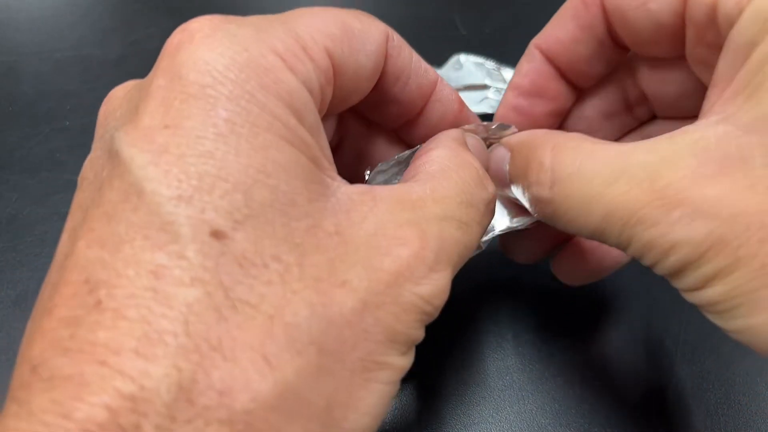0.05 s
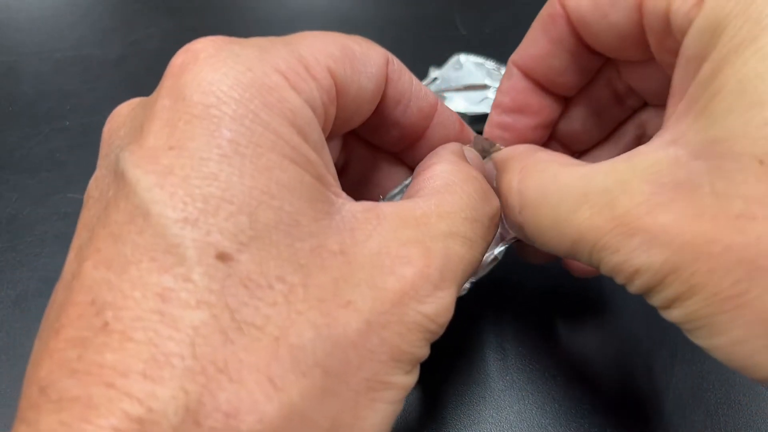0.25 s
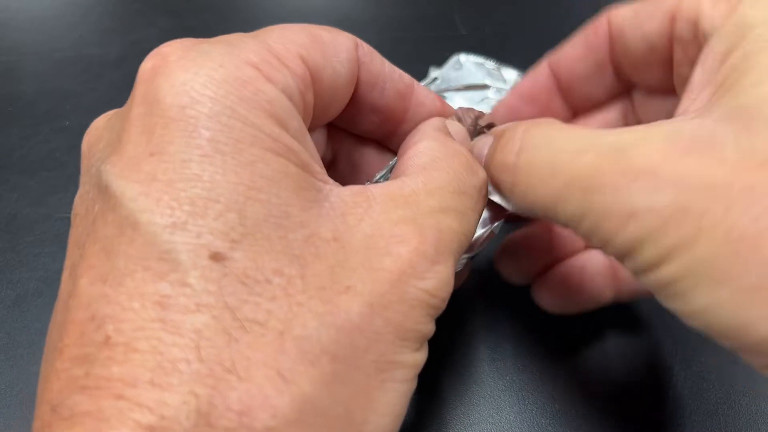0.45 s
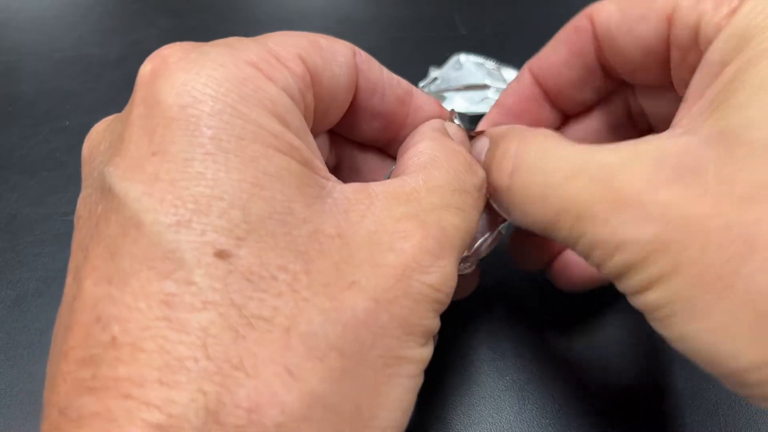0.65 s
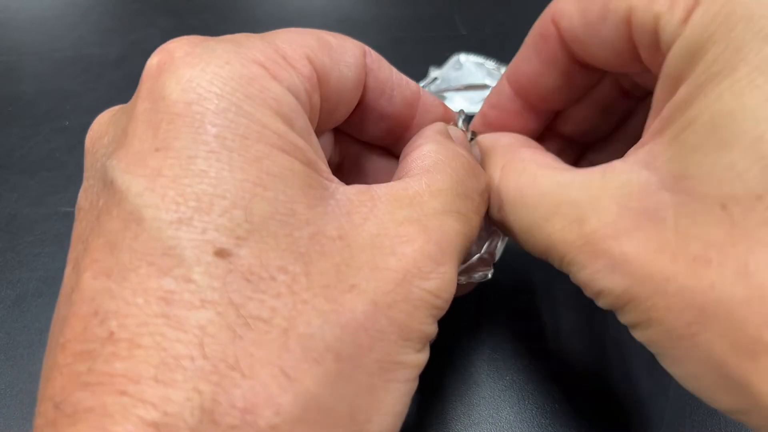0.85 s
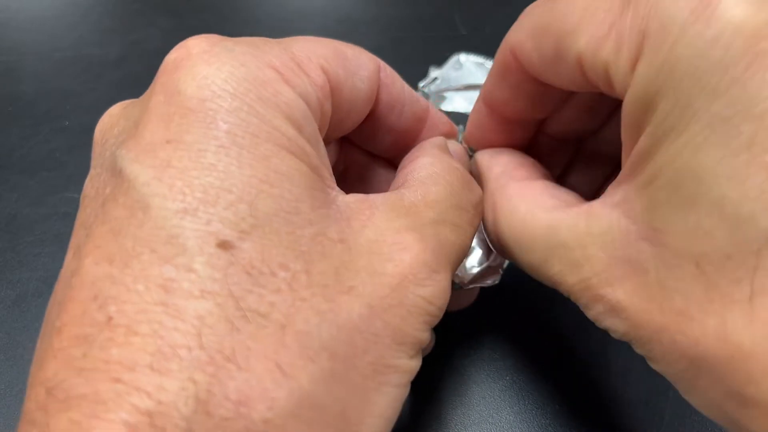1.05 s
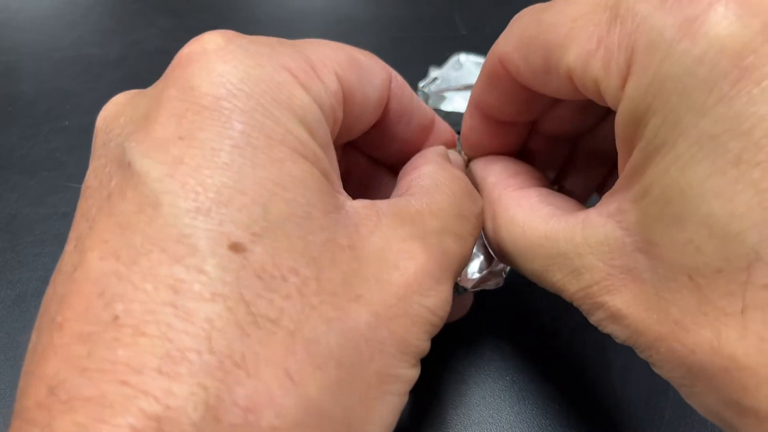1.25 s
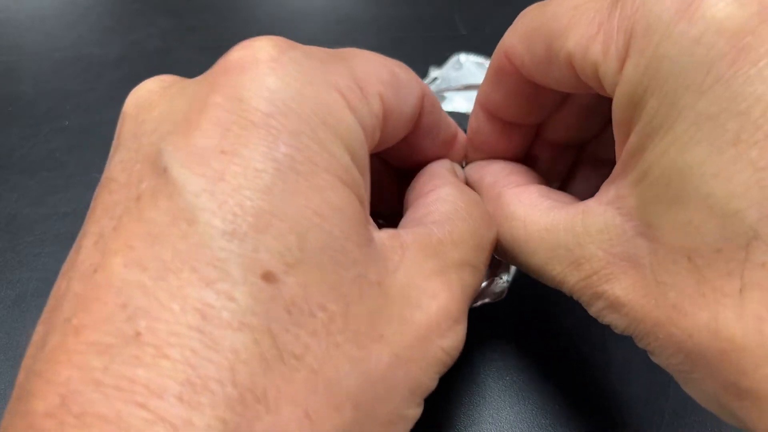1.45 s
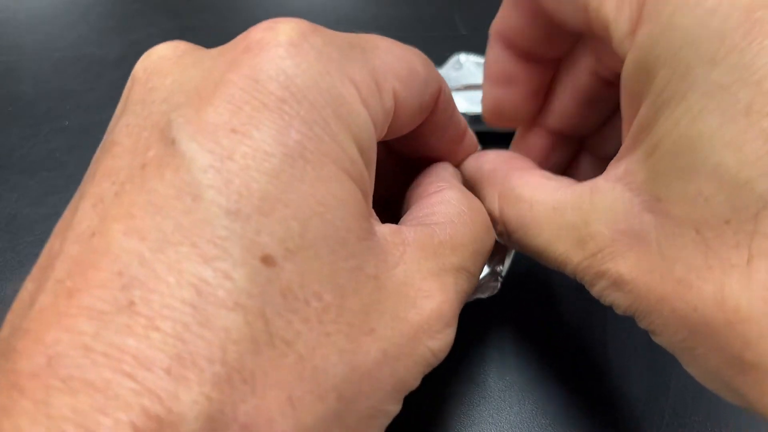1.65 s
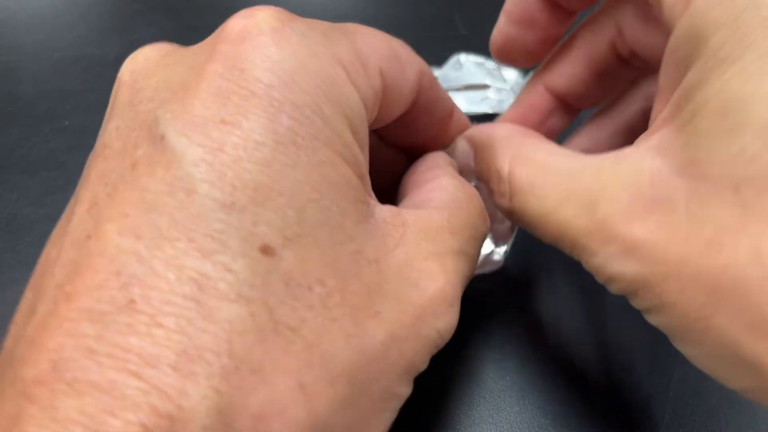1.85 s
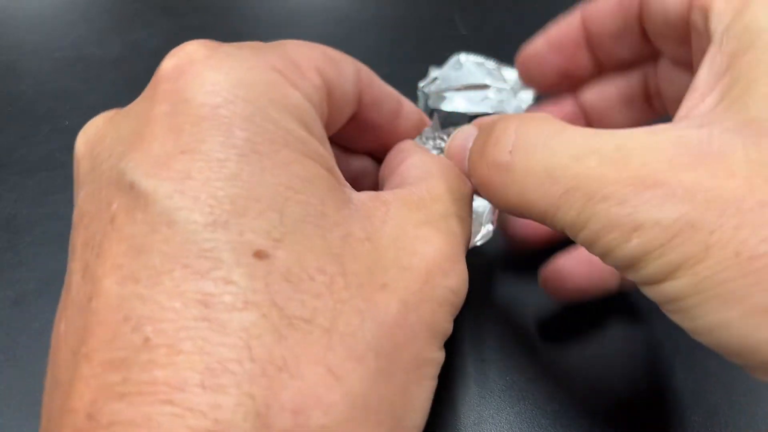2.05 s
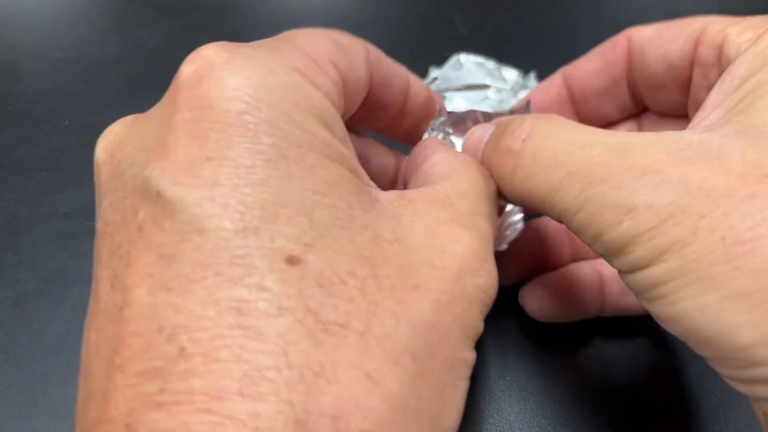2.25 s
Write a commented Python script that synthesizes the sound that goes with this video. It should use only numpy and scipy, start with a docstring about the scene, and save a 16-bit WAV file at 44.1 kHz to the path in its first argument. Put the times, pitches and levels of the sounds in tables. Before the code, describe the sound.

Aluminum foil is folded and pinched by fingers: faint rustle, a cluster of crackles peaking in two sharp snaps, soft rubbing, then scattered brighter ticks. Close stereo microphone, quiet room with low ventilation rumble.

```python
"""Crumpled foil in the fingers, close up

Fingers fold and pinch a crumpled sheet of aluminium foil close to a two-port microphone in a quiet room.
Creases buckle with short snaps: a crack, then a dying burst of grains. Fingertips rub the sheet into a fine
rustle of clumped grains. Both ring the same foil resonances and a gliding hollow; ventilation noise
rumbles underneath with two narrow hums."""
import sys
import numpy as np
from scipy import signal
from scipy.fft import rfft, irfft, next_fast_len
from scipy.io import wavfile

SR = 44100
rng = np.random.default_rng(int(sys.argv[2]) if len(sys.argv) > 2 else 0)


def int16_out(signal):
    """Quantize to a 16-bit WAV file."""
    q = np.round(np.clip(np.atleast_2d(signal).T, -1, 1) * 32767)
    wavfile.write(sys.argv[1], SR, q.astype(np.int16))


N = 101429

# Creases buckling under the fingers. Each row: start in seconds, level in dB before SNAP_DB,
# favoured pitch in Hz, tilt in dB per octave, decay by 60 dB in seconds, extra low body in dB.
CREASE_SNAPS = [(0.0888,-37,1990,-4.5,0.019,7), (0.16,-47.5,1910,-8,0.053,-22),
                (.2139,-43,2170,2.5,0.027,-15), (0.363,-42,1960,-8.5,0.019,-16), (0.377,-34,1900,0,0.024,6),
                (0.3859,-31,2220,-2,0.044,-23), (0.4215,-33,5200,1.5,0.056,-1),
                (0.428,-35.5,3600,-3.5,.015,-15), (0.4737,-37.5,2020,-2,0.021,-20),
                (0.5565,-25.5,4780,2.5,0.011,-20), (0.5665,-24,4440,-3,0.0092,-8),
                (0.5725,-23.5,1990,-0.5,0.013,-16), (0.6032,-23,3250,-2.5,0.013,-18),
                (0.646,-52,1200,-7,0.013,8), (.6756,-12,3300,-1.2,0.0049,-2),
                (.715,-20.5,3640,-7.5,0.0059,-17), (.7318,-5.5,3370,-1,0.0082,-2),
                (0.742,-38.5,4550,-2,0.015,-13), (0.9565,-39,6130,-3,.01,-15),
                (1.3252,-52,3630,-3.5,0.018,-8), (1.4326,-41.5,4800,3,0.013,-8),
                (1.5111,-16,11860,4,0.014,15.5), (1.529,-46.5,776,-8,0.0078,18.5),
                (1.6285,-47.5,1820,-4.5,0.082,7.5), (1.64,-45,4830,6.5,0.031,-6),
                (1.707,-32,3900,-2,0.032,0), (1.7219,-29,3600,-2.5,0.037,7), (1.7669,-19.5,9740,3,0.02,8.5),
                (1.771,-32,1260,1.5,0.015,14), (1.826,-48.5,2000,-14,.015,-11),
                (1.8673,-52,13000,12.5,0.033,-8), (1.9093,-38,11900,9,0.022,-8),
                (1.9552,-49,3720,-3,0.034,6), (1.982,-22,6530,6,0.026,10.5),
                (2.0128,-41,6740,-13,0.011,-7.5), (2.016,-33.5,6700,-0.5,0.021,6),
                (2.2638,-47,3830,4,0.032,-6)]
# Finger pressure on the sheet, heard as rustle. Each row: time in seconds, level in dB, tilt in dB per octave.
FINGER_PRESSURE = [(0, -58.5, -1.5), (0.07, -68, -1), (0.094, -64.5, -10.5), (0.16, -56.5, -6.5),
                   (0.239, -53, -5), (0.275, -66.5, -4.5), (0.345, -68.5, -2.5), (0.365, -49.5, -4.5),
                   (0.41, -51, -3.5), (0.423, -46, -1), (0.454, -41, 0), (0.47, -51.5, -0.5),
                   (0.53, -56, -1), (0.55, -54, -3), (0.561, -42, 1), (0.59, -49, -0.5), (0.62, -64, -3),
                   (0.638, -58, -6.5), (0.648, -53.5, -2), (0.7, -52, -4.5), (0.75, -53, -3),
                   (0.8, -57.5, -3), (0.87, -63, -3.5), (0.92, -60.5, -1), (1.0, -53, -2.3),
                   (1.062, -62, -4), (1.111, -53, -5), (1.165, -61, -1.7), (1.191, -74.5, -6),
                   (1.225, -75, -9.5), (1.239, -60, -6.5), (1.265, -68, -5), (1.285, -52.5, -5),
                   (1.316, -60, -4.5), (1.332, -52.5, -3), (1.421, -59.5, -2.5), (1.469, -57.5, -4),
                   (1.53, -50.5, -1.5), (1.59, -60, -3.5), (1.619, -72, -3), (1.644, -59, 0),
                   (1.7, -51.5, -5), (1.745, -61, -5.5), (1.79, -56, -4.5), (1.835, -60.5, -1.5),
                   (1.85, -49.5, -1.5), (1.869, -48, 1.5), (1.929, -44, 2.5), (1.944, -67, -1),
                   (1.958, -45.5, -1), (1.972, -56, 2.5), (2.0, -68, -12), (2.013, -55, 7),
                   (2.055, -62, -4), (2.075, -73, -6), (2.105, -60, 3.5), (2.14, -67, -8.5),
                   (2.149, -80, 0), (2.175, -77, -5), (2.191, -55, 6), (2.215, -66.5, -4),
                   (2.244, -75.5, -1), (2.263, -50.5, 0.5), (2.3, -59, 0.5)]
# The resonance the grip favours in the rustle. Each row: time in seconds, pitch in Hz, lift in dB.
GRIP_RESONANCE = [(0, 1900, -18), (.3, 4700, 4.5), (.55, 5360, 6.5), (.7, 3540, -2), (1.05, 3460, 2.5),
                  (1.12, 1220, 5), (1.25, 1310, 3), (1.32, 4200, 5), (1.6, 3760, -8), (1.7, 1950, -6),
                  (1.9, 6560, 1), (2.0, 6760, 18.5), (2.22, 6880, 14.5), (2.27, 4030, 5.5)]
# Low body of the rustle. Each row: time in seconds, extra level in dB.
RUSTLE_BODY = [(0, -8), (.15, -3.5), (.3, -5.5), (.5, -1), (.7, -1.5), (1.1, -2), (1.4, -4.5), (1.55, 1),
               (1.75, -1.5), (1.95, 0), (2.3, -5.5)]
# Resonances of the folded sheet between the hands. Each row: centre in Hz, width in Hz, relative level in dB.
FOIL_RESONANCES = [(276, 69, -16.5), (436, 320, -11.5), (740, 820, -10), (1222, 340, -9.5),
                   (1980, 700, -23), (2940, 990, -9.5), (3576, 390, -4), (4610, 725, -2.5),
                   (4970, 520, -4.5), (6354, 690, -5.5), (7540, 520, -5), (9240, 1130, -1.5),
                   (10380, 820, -4), (11100, 1100, -2.5), (12500, 3700, 0), (14470, 2640, -3.5)]
# Narrow ring of the hollow between sheet and hands. Each row: time in seconds, centre in Hz, level in dB.
HOLLOW_RING = [(.09, 1944, -5.5), (.17, 1880, -3), (.36, 1945, -12.5), (.485, 2107, -6), (.6, 2027, -9.5),
               (.72, 1794, -11.5), (1.5, 1793, -14.5), (1.72, 1984, -7), (1.77, 2020, -12.5),
               (1.9, 1930, -0.5), (2.0, 1835, -4.5), (2.14, 1970, -6)]
# Colour of the room noise. Each row: frequency in Hz, relative density in dB per Hz.
AIR_SPECTRUM = [(11, -62), (18, -9.5), (70, 5), (160, -0.5), (268, -7.5), (398, -21.5), (529, -21),
                (703, -27), (961, -45), (1240, -59), (2450, -56), (8090, -69), (16000, -71)]
# Likeness of the room noise at the two ports. Each row: frequency in Hz, left-right correlation.
AIR_LIKENESS_BY_HZ = [(60, 1), (130, 1), (260, 0.71), (550, 0.06), (1200, 0.23), (8000, 1)]
# Fan hum. Each row: centre in Hz, width in Hz, rms level in dB.
FAN_HUM = [(116.1, 1.47, -63.5), (243.9, 6.5, -64.5)]
# Phase between the microphone ports. Each row: frequency in Hz, lead of the left port in radians.
PORT_LEAD = [(0, 0), (1350, .4), (1550, 2.8), (1750, 0), (2500, .5), (3100, 1.2), (4000, 1), (4700, .5),
             (5100, 0), (5600, -1.1), (6700, -1.2), (7700, -2.6), (8400, -3.14), (9000, -3.5),
             (11100, -5.9), (12100, -6.3), (14300, -8.4), (15300, -9.4), (16500, -9.4)]
# Level between the microphone ports. Each row: frequency in Hz, left minus right in dB.
PORT_LEVEL = [(60, 2.5), (99, -3), (160, -1.5), (270, -1), (450, 0.5), (740, 2.5), (1220, 5.5),
              (2010, -2.5), (3330, 4), (5500, 2.5), (9080, 0.5), (15000, -0.5)]

# snaps
SNAP_DB, SNAP_SCATTER_DB, SNAP_RISE_S = -6.5, 2.5, .0003
SNAP_GRAINS_PER_S, SNAP_UNEVEN_DB = 14000, 5.5
CRACK_DB = -3  # crack against the burst that follows
# rustle: fine grains, sparser micro-ticks, and level wander with its bandwidth in Hz
RUB_GRAINS_PER_S, RUB_UNEVEN_DB = 7000, 2.5
TICKS_PER_S, TICK_UNEVEN_DB, TICK_DB = 700, 4.5, -7.5
CLUMP_DB, CLUMP_HZ = 1, 38
SHIMMER_DB, SHIMMER_HZ = 0.28, 12.7  # each resonance on its own
GLINT_DB, GLINT_HZ = 2, 50  # the same, quicker
# colour of both drives
FAVOUR_DB, FAVOUR_OCTAVES = 5.5, 0.13
TILT_FOOT_HZ, TILT_PIVOT_HZ, SNAP_TILT_TOP_HZ, RUB_TILT_TOP_HZ = 1000, 4000, 15000, 9000
BODY_TOP_HZ = 1500  # resonances below this are the low body
HOLLOW_WIDTH_HZ, HOLLOW_FED_BY = 116, 4  # index of the foil resonance whose drive feeds the hollow
# surroundings and microphone
SPREAD_DB, SPREAD_S = -14, 0.0034  # rustle reaching each ear from the whole sheet
ROOM_DB, ROOM_T60_S, ROOM_DELAY_S = -24, .07, .003
AIR_DB = -53.5
CUTOFF_HZ = 16700


def snaps():
    """Drive of each resonance: one crack, then a dying burst of grains; the low body answers the crack alone."""
    burst = grains(SNAP_GRAINS_PER_S, SNAP_UNEVEN_DB)
    spread = rng.standard_normal((len(CREASE_SNAPS), len(FOIL_RESONANCES)))
    hz = np.array(FOIL_RESONANCES)[:, 0]
    low = hz < BODY_TOP_HZ
    drive = np.zeros((len(hz), N))
    for (start, db, pitch, tilt, t60, body), chance in zip(CREASE_SNAPS, spread):
        first = int(start * SR)
        t = np.arange(min(int(t60 * SR), N - first)) / SR
        shape = (1 - np.exp(-t / SNAP_RISE_S)) * amp(-60 * t / t60)
        tint = colour(hz, tilt, SNAP_TILT_TOP_HZ, pitch, FAVOUR_DB) + low * body
        gain = amp(db + SNAP_DB + tint + SNAP_SCATTER_DB * chance)
        stretch = slice(first, first + len(t))
        drive[:, stretch] += np.outer(gain * ~low, shape * burst[stretch])
        # the crack is a single click, sized by the energy of the burst
        drive[:, first + int(SNAP_RISE_S * SR)] += gain * amp(CRACK_DB) * np.sqrt(np.sum(shape ** 2))
    return drive


def rustle():
    """Drive of each resonance: clumped grains and ticks under the finger pressure, each resonance shimmering."""
    level, tilt = in_time(FINGER_PRESSURE)
    pitch, lift = in_time(GRIP_RESONANCE)
    body, = in_time(RUSTLE_BODY)
    fine = grains(RUB_GRAINS_PER_S, RUB_UNEVEN_DB)
    ticks = amp(TICK_DB) * grains(TICKS_PER_S, TICK_UNEVEN_DB)
    rub = (fine + ticks) * amp(level + CLUMP_DB * drift(CLUMP_HZ))
    drive = []
    for hz, _, _ in FOIL_RESONANCES:
        tint = colour(hz, tilt, RUB_TILT_TOP_HZ, pitch, lift) + (hz < BODY_TOP_HZ) * body
        flicker = SHIMMER_DB * drift(SHIMMER_HZ) + GLINT_DB * drift(GLINT_HZ)
        drive.append(rub * amp(tint + flicker))
    return np.array(drive)


def colour(hz, tilt, top_hz, pitch, favour_db):
    """Level in dB of a resonance: a tilt over the middle range plus a lift around the favoured pitch."""
    slope = tilt * np.log2(np.clip(hz, TILT_FOOT_HZ, top_hz) / TILT_PIVOT_HZ)
    return slope + favour_db * np.exp(-(np.log2(hz / pitch) / FAVOUR_OCTAVES) ** 2)


def foil(drive):
    """A drive rings the sheet's resonances, in alternating sign, and the hollow behind it."""
    sound = hollow(drive[HOLLOW_FED_BY])
    for k, (hz, width, db) in enumerate(FOIL_RESONANCES):
        narrowness = np.sqrt(SR / 4 / width) / 2  # makes up for the noise a narrow ring lets by
        sound = sound + (-1) ** k * amp(db) * narrowness * resonate(drive[k], hz, width)
    return sound


def hollow(drive):
    """A resonance whose centre glides as the hands move: shift down, smooth, shift back."""
    hz, db = in_time(HOLLOW_RING)
    turn = np.exp(2j * np.pi * np.cumsum(hz) / SR)
    r = np.exp(-np.pi * HOLLOW_WIDTH_HZ / SR)
    ring = signal.lfilter([1 - r], [1, -r], (drive + 1e-18) / turn) * turn
    return amp(db) * np.sqrt(SR / 4 / HOLLOW_WIDTH_HZ) * ring.real


def scatter(x, level_db, t60, delay):
    """A diffuse dying tail of noise, different in each ear."""
    t = np.arange(int(t60 * SR)) / SR
    tail = rng.standard_normal((2, len(t))) * amp(-60 * t / t60) * (t > delay)
    tail = tail / np.sqrt((tail ** 2).sum() / 2)
    return amp(level_db) * signal.fftconvolve(x[None], tail, axes=1)[:, :N]


def air():
    """Ventilation rumble and hiss as shaped noise, with two hum lines of narrow, wavering noise."""
    hz = np.fft.rfftfreq(N, 1 / SR)
    mid, side = rfft(rng.standard_normal((2, N))) * amp(at_hz(AIR_SPECTRUM, hz))
    alike = np.clip(at_hz(AIR_LIKENESS_BY_HZ, hz), -1, 1)
    noise = irfft(np.sqrt(1 + alike) * mid + np.sqrt(1 - alike) * side * [[1], [-1]], N)
    hum = sum(amp(db) * rms_one(resonate(rng.standard_normal(N), f, width)) for f, width, db in FAN_HUM)
    return amp(AIR_DB) * rms_one(noise) + hum


def grains(rate, uneven_db):
    """Tiny random clicks of uneven size and either sign, rms 1; rate is the mean number per second."""
    size = amp(uneven_db * np.minimum(rng.exponential(1, N), 4)) * rng.choice([-1, 1], N)
    return rms_one(size * (rng.random(N) < rate / SR))


def resonate(x, hz, width):
    """Two-pole resonance, gain 1 on top."""
    r = np.exp(-np.pi * width / SR)
    zeros = np.array([1, 0, -1]) * (1 - r * r) / 2
    poles = [1, -2 * r * np.cos(2 * np.pi * hz / SR), r * r]
    return signal.lfilter(zeros, poles, x + 1e-18)


def drift(rate):
    """Slow random wander, spread 1: noise smoothed below rate in Hz, drawn at every 20th sample."""
    r = np.exp(-2 * np.pi * rate * 20 / SR)
    noise = rng.standard_normal(N // 20 + 2002)
    slow = signal.lfilter([1], [1, -2 * r, r * r], noise)[2000:]  # skip the settling
    return np.interp(np.arange(N) / 20, np.arange(len(slow)), rms_one(slow))


def in_time(rows):
    """Columns of a curve, sample by sample."""
    s, *columns = np.transpose(rows)
    return [np.interp(np.arange(N) / SR, s, c) for c in columns]


def at_hz(points, hz):
    """Read a spectrum table on a log-frequency axis."""
    f, v = np.transpose(points)
    return np.interp(np.log(hz + 1), np.log(f + 1), v)


def amp(db):
    """Decibels to gain."""
    return 10 ** (np.asarray(db) / 20)


def rms_one(x):
    """Scale to unit rms."""
    return x / np.sqrt(np.mean(x ** 2) + 1e-20)


def scene():
    """Foil close by, its tail in the room, the room's air."""
    snapped, rubbed = foil(snaps()), foil(rustle())
    wide = rubbed + scatter(rubbed, SPREAD_DB, SPREAD_S, 0)
    room = scatter(snapped + rubbed, ROOM_DB, ROOM_T60_S, ROOM_DELAY_S)
    return snapped + wide + room + air()


def record(dry):
    """The two microphone ports differ in phase and level by frequency; the top is cut."""
    size = next_fast_len(N + 2048)
    hz = np.fft.rfftfreq(size, 1 / SR)
    f, phase = np.transpose(PORT_LEAD)
    # each port takes half of the difference
    half = amp(at_hz(PORT_LEVEL, hz) / 2) * np.exp(.5j * np.interp(hz, f, phase))
    ports = irfft(rfft(dry, size) * [half, 1 / half], size)[:, :N]
    low_pass = signal.cheby2(14, 50, CUTOFF_HZ, fs=SR, output="sos")  # 50 dB down from the cutoff up
    return signal.sosfilt(low_pass, ports)


dry = scene()
out = record(dry)
int16_out(out)
```